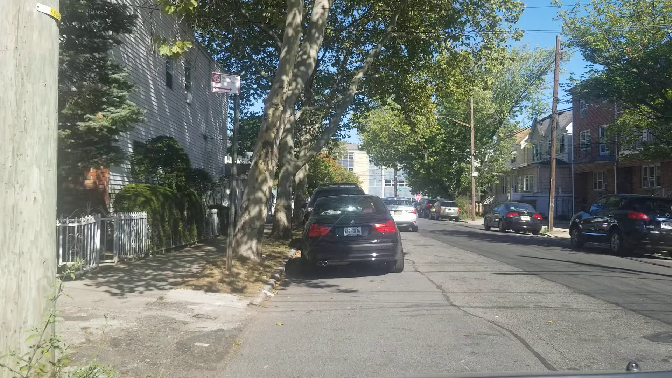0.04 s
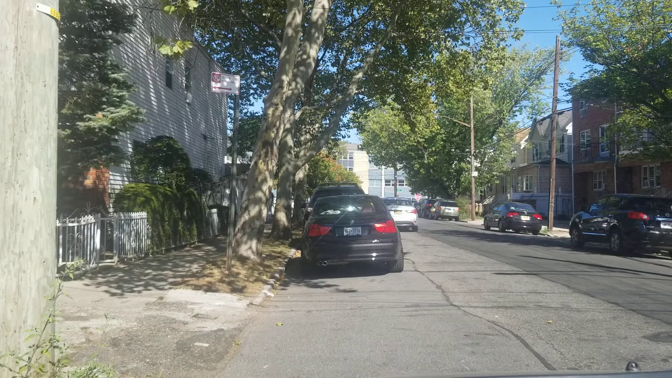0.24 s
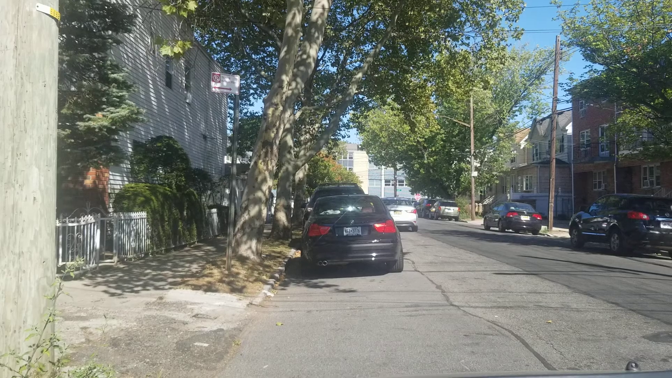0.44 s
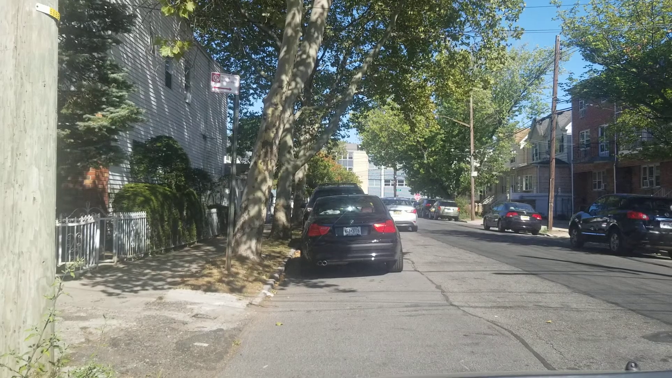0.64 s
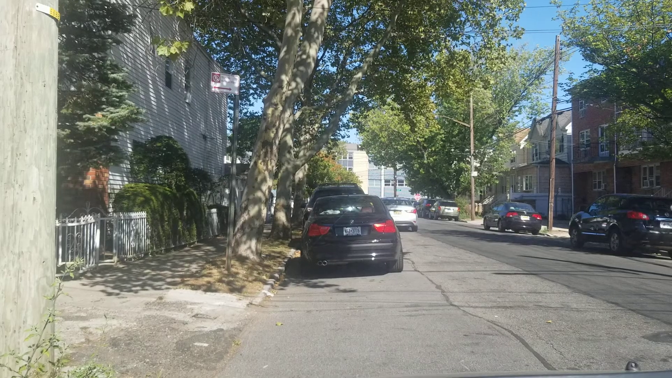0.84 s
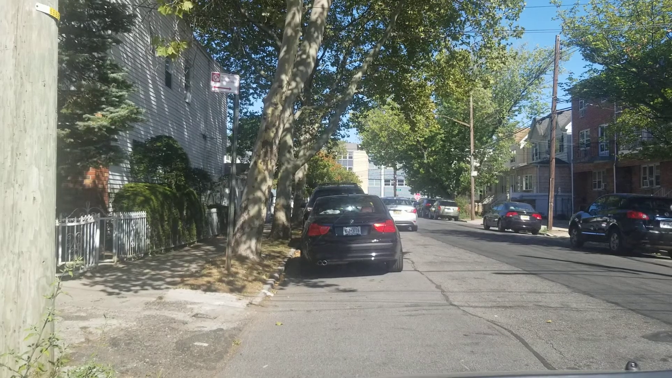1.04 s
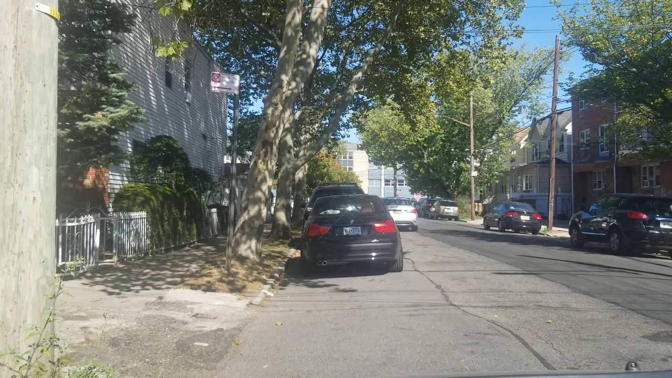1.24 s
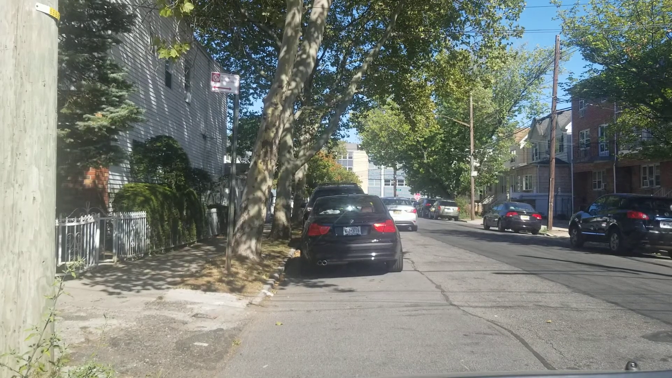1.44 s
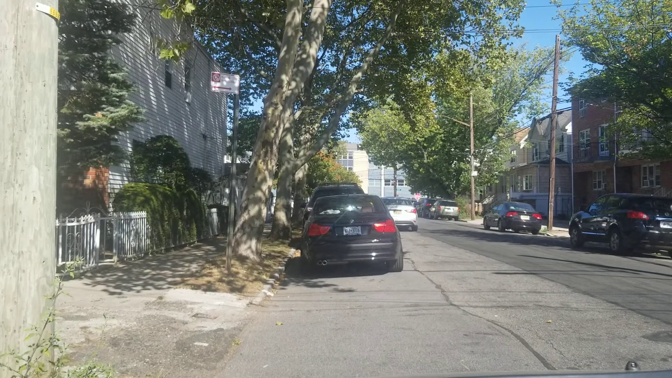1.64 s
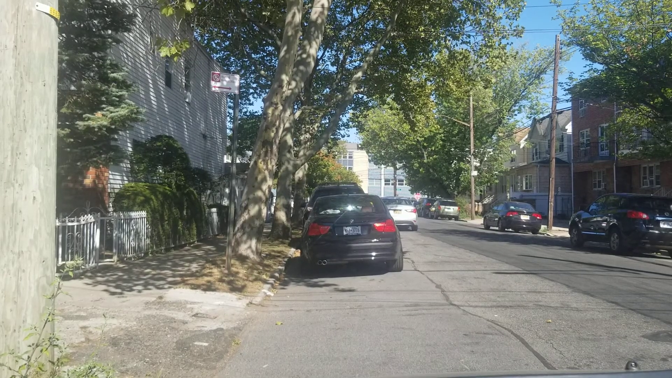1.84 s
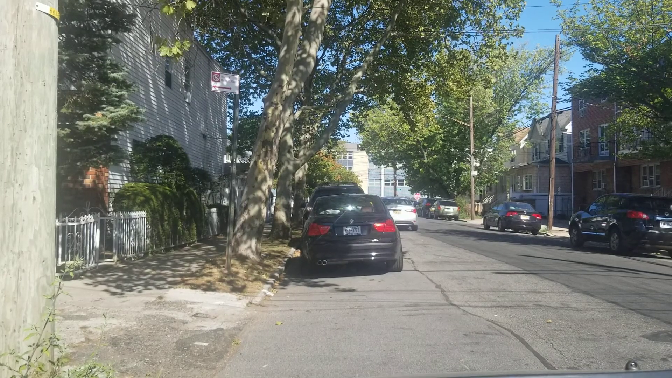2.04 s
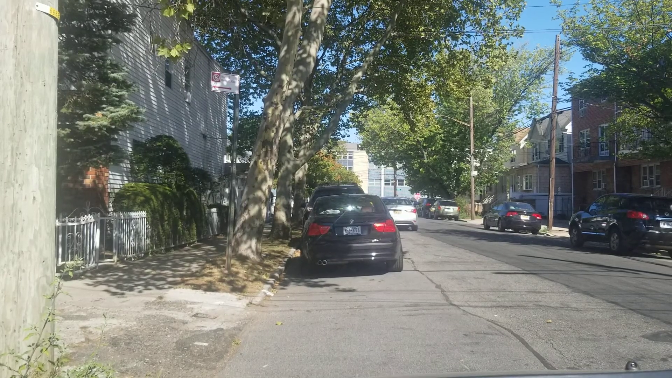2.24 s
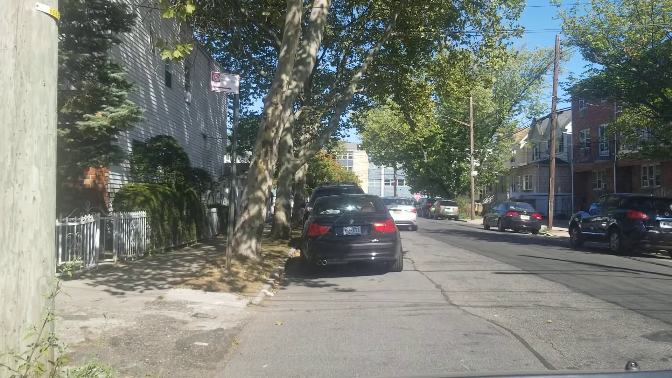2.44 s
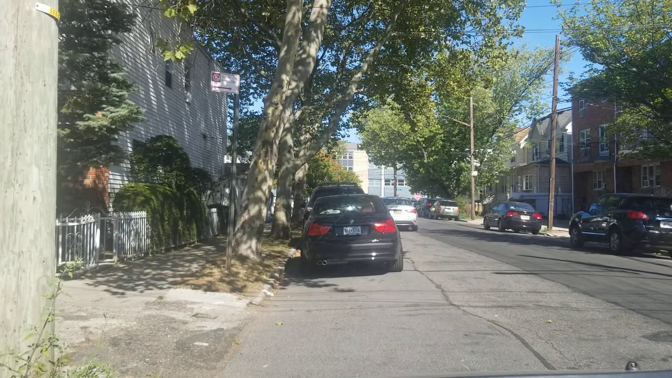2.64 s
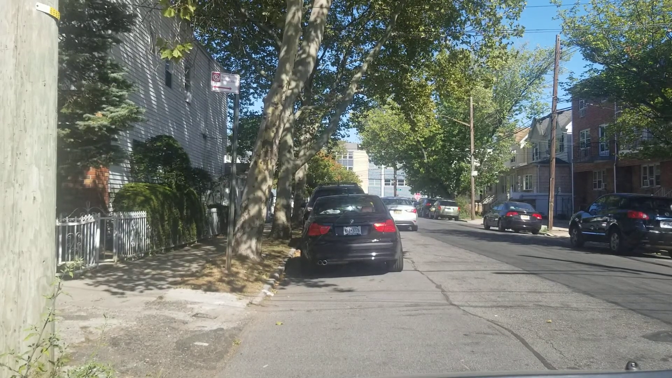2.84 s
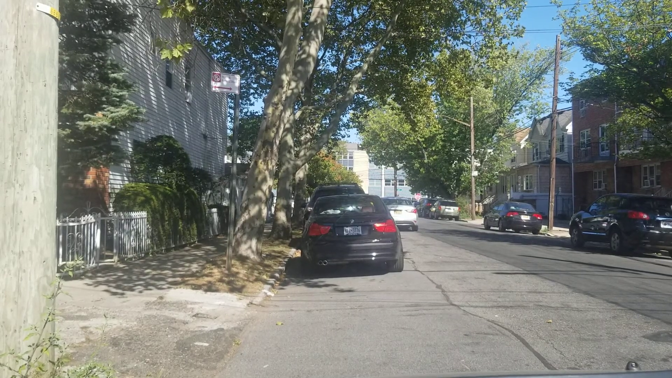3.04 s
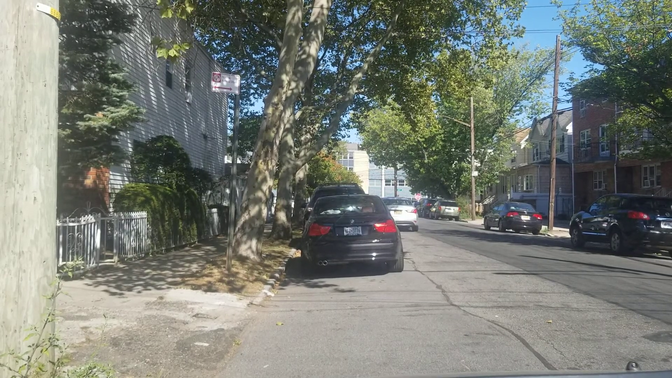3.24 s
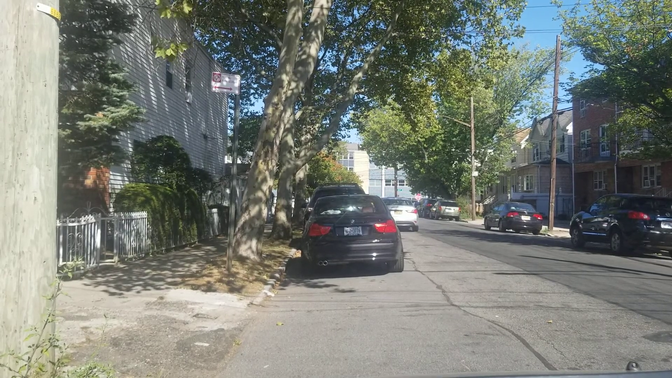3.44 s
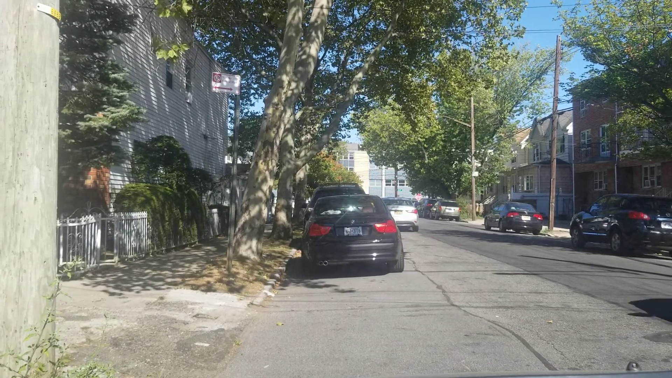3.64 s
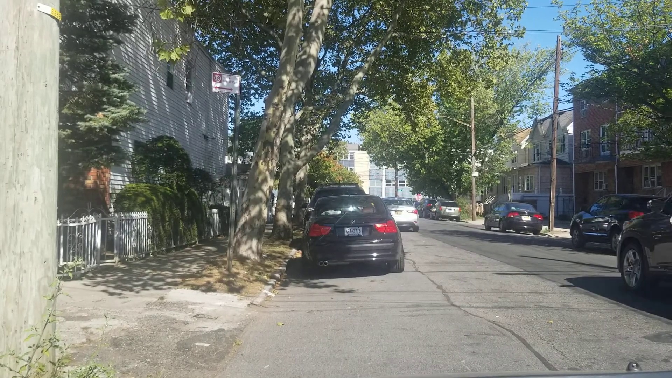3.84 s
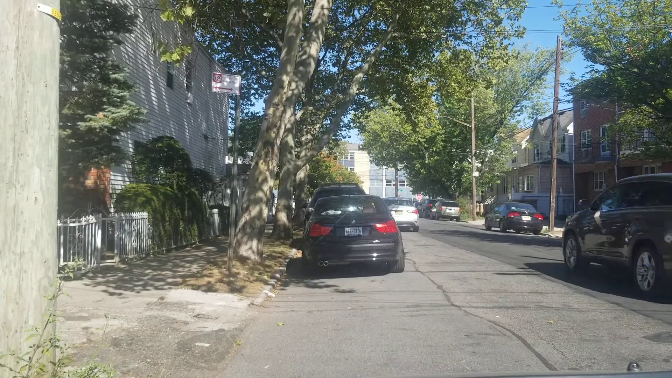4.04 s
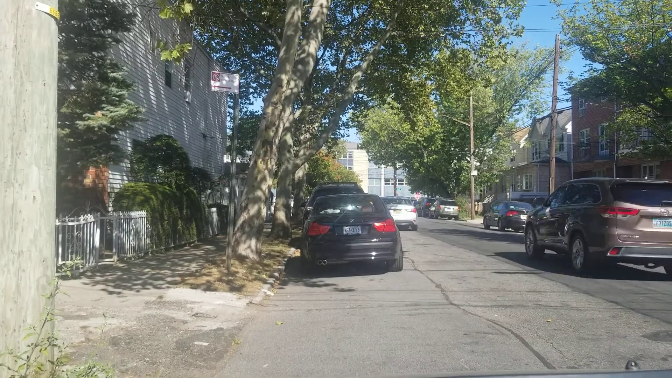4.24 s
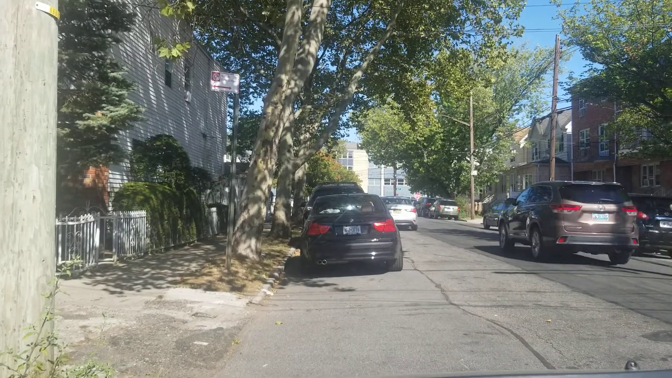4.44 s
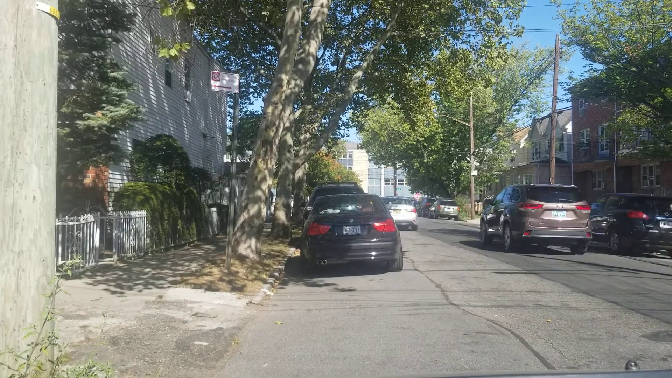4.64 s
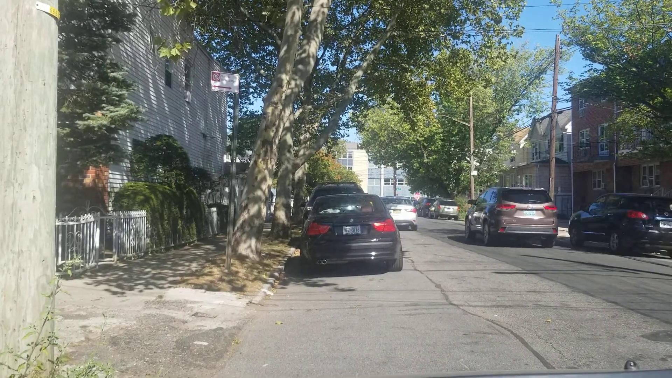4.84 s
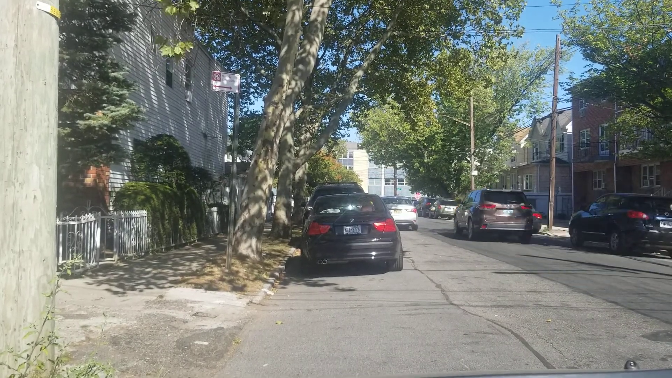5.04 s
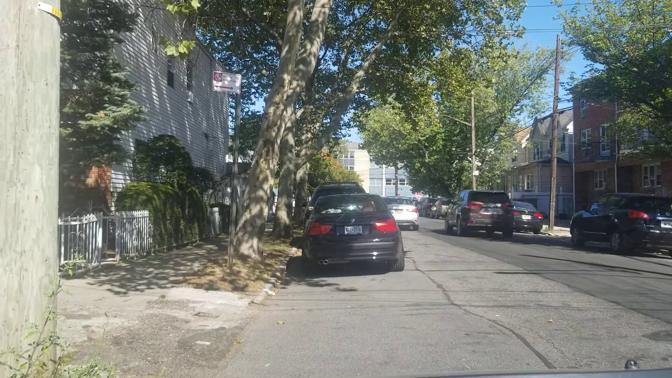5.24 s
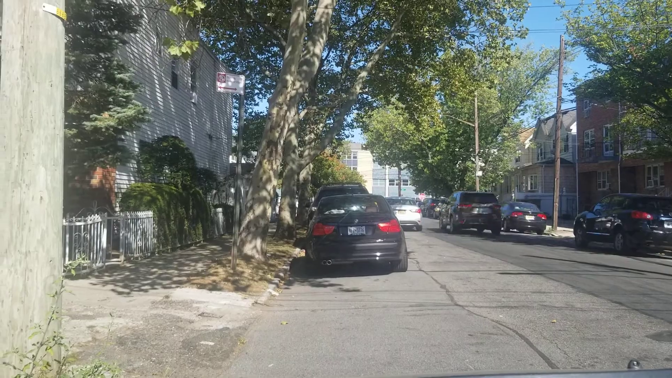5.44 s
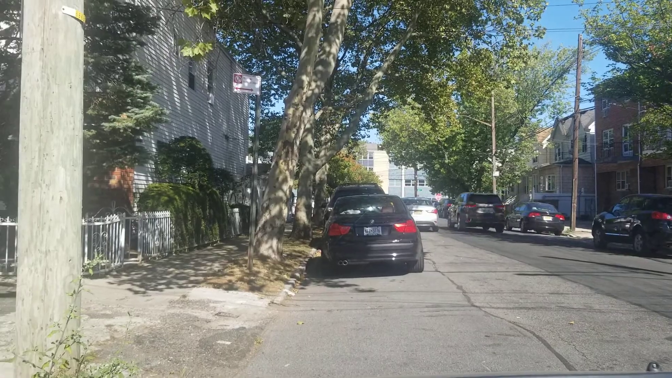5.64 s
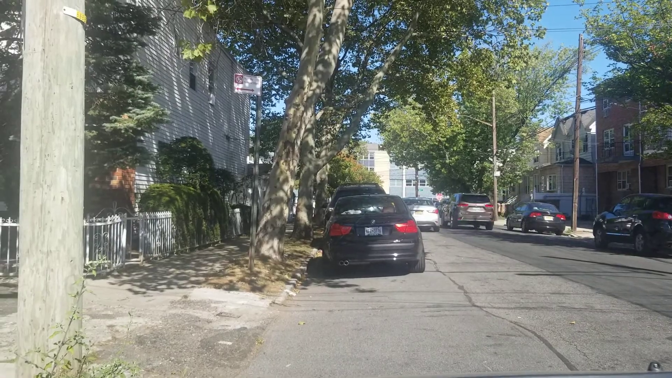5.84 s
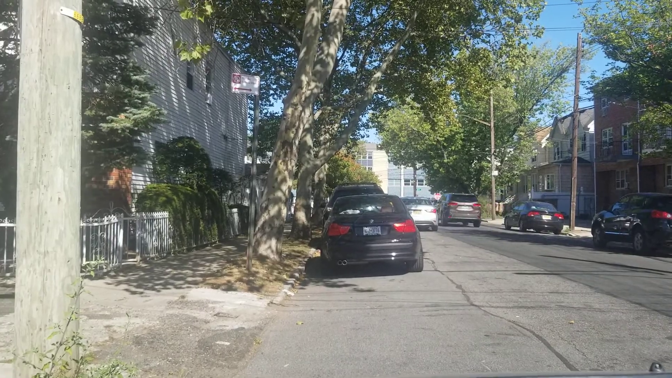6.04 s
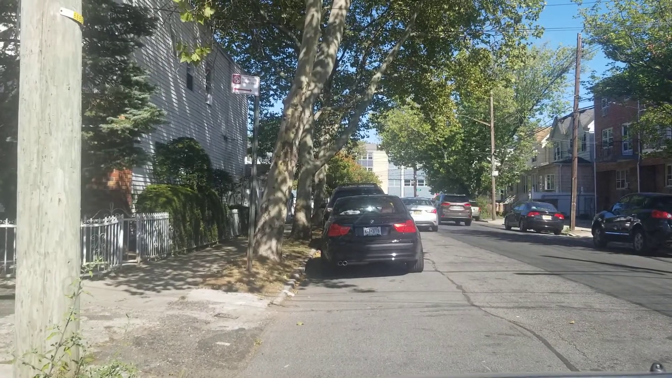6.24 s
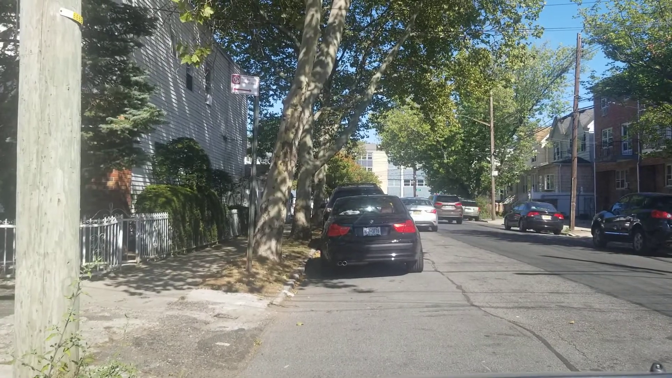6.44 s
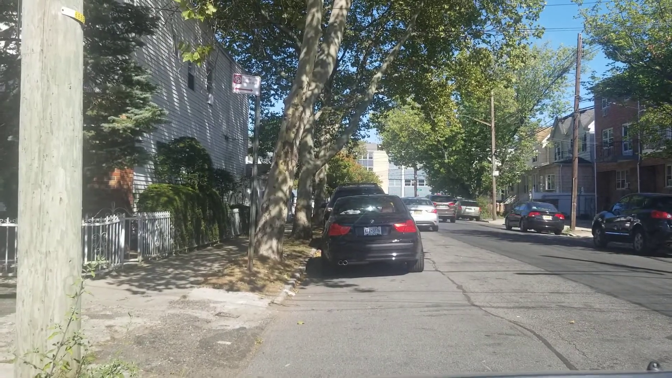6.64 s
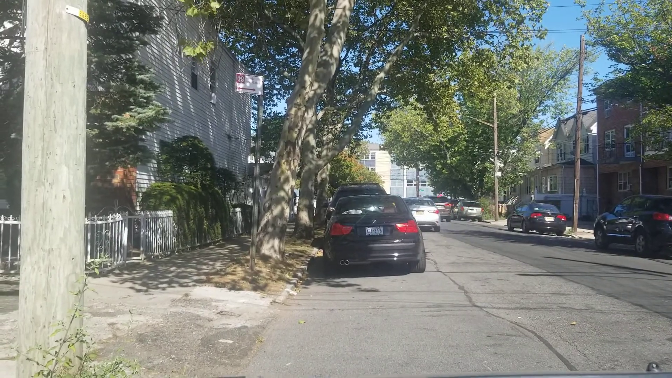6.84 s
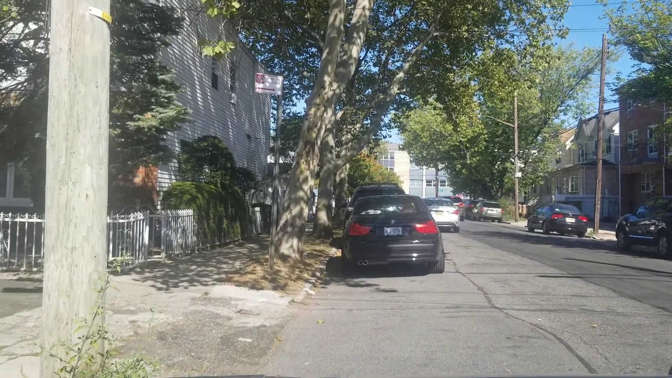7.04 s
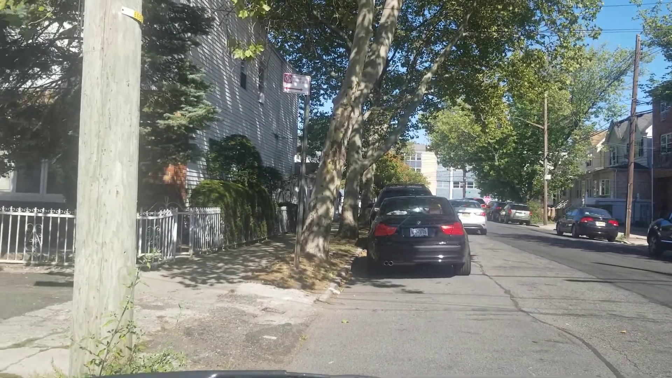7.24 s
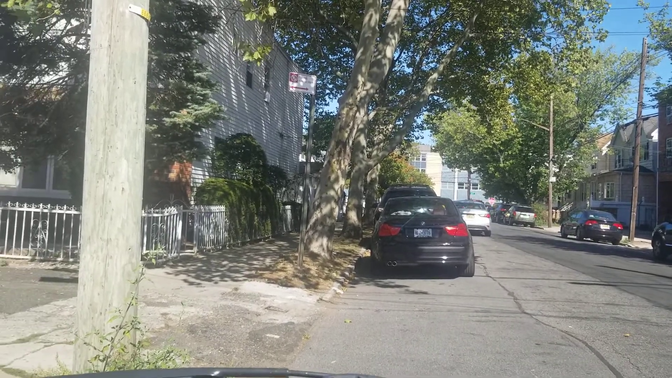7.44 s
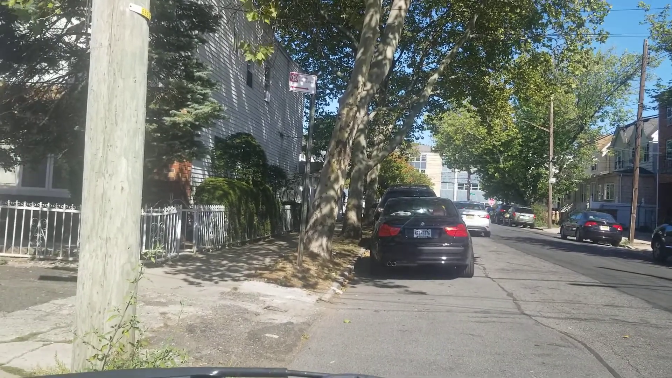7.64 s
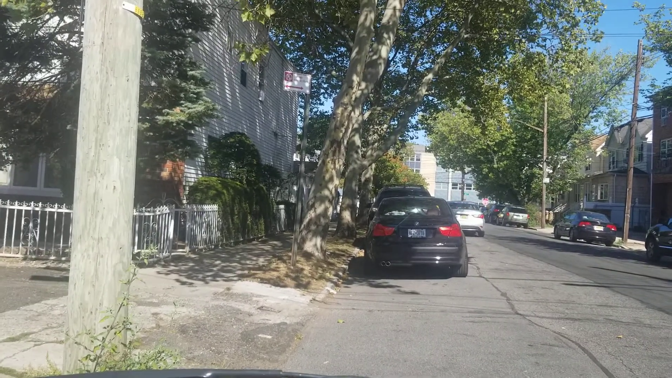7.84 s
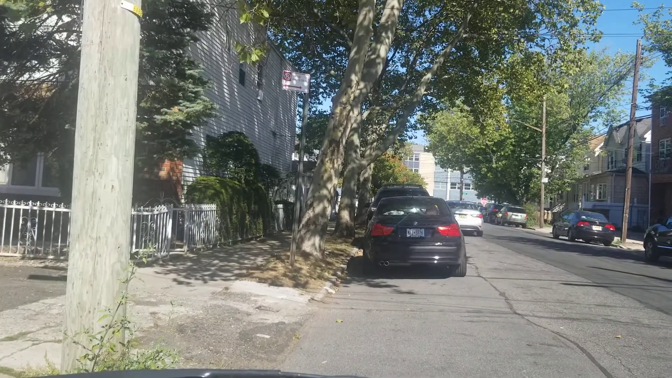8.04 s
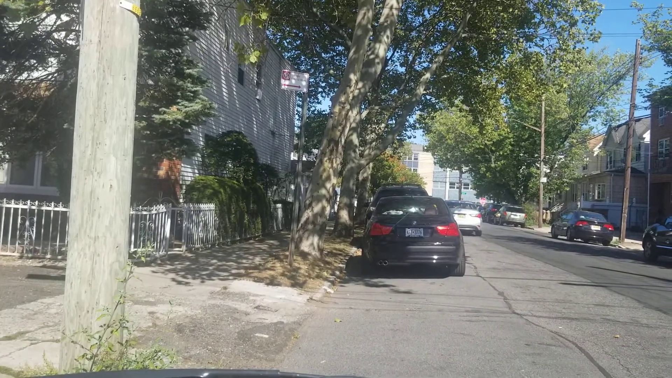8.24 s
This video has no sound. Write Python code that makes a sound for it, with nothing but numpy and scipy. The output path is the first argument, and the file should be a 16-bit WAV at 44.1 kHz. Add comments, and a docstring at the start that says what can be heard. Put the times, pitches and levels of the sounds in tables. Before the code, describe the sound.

From the front seats of a stationary car, a low four-cylinder idle hum, body rumble and diffuse air hiss run throughout. At 0-0.6 s thin, airy, high squeaks slide downward. Soft rubbing strokes come and go until about 3.4 s. At 1.1 s a cluster of dull knocks lands within a brief low rumble swell. A car approaches outside, its tyre roar and blurred tread hum strongest near 3 s, the tone falling as it passes and fades by about 4.5 s. Isolated plastic clicks at 2.4 and 2.7 s lead to sharp snaps and low knocks at 3.6-4.1 s. Faint knocks follow near 5 s. From 5.2 s close, dry clicks with hollow panel thumps come in irregular bursts, with a quick weakening creak at 6 s and soft knocks to 6.6 s. Clicking stays dense to the end at 8.3 s, with a buzzing springy twang around 7.96 s.

```python
"""Idling car with creaking plastic

The cabin of an idling car: rumble, air hiss and a four-cylinder hum made of crankshaft orders.
Coloured noise and a blurred tread tone pass outside as another car overtakes; a low rumble swells once.
Swelling friction noise makes soft rubbing, and gliding narrow noise makes thin squeaks.
Close by, hard plastic clicks and creaks in bursts of filtered noise over a ringing panel;
dull knocks are damped sines, and a springy part twangs a few times."""
import sys
import numpy as np
from scipy import signal
from scipy.fft import rfft, irfft, next_fast_len
from scipy.io import wavfile
from scipy.ndimage import uniform_filter1d

SR = 44100
rng = np.random.default_rng(int(sys.argv[2]) if len(sys.argv) > 2 else 0)


def log_audio(samples):
    """Write samples as a 16-bit WAV file to the path given in sys.argv[1]."""
    # one column per channel
    frames = np.atleast_2d(samples).T
    # limit to full scale, then quantise
    limited = np.clip(frames, -1, 1)
    pcm = np.round(limited * 32767).astype(np.int16)
    wavfile.write(sys.argv[1], SR, pcm)


N = 366030
TIME = np.arange(N) / SR


def from_db(db):
    """Decibels to gain."""
    return 10 ** (np.asarray(db) / 20)


def rms_one(x):
    """Scale to rms 1."""
    return x / np.sqrt(np.mean(x ** 2) + 1e-20)


def hit_one(x):
    """Scale a short sound to the energy of 10 ms at rms 1."""
    return rms_one(x) * np.sqrt(.01 * SR / x.shape[-1])


def in_time(rows):
    """Each column of a curve, interpolated at every sample."""
    s, *columns = np.transpose(rows)
    return [np.interp(TIME, s, c) for c in columns]


def pan(db):
    """Left and right gains of constant total power; positive dB favours the left."""
    gains = from_db(np.array([[db], [-db]]) / 2)
    return rms_one(gains)


def drift(rate):
    """Slow random sway with spread 1; a higher rate in Hz sways faster."""
    step = 40  # samples between the computed points
    r = np.exp(-2 * step * np.pi * rate / SR)
    noise = rng.standard_normal(N // step + 2002)
    slow = signal.lfilter([1], [1, -2 * r, r * r], noise)[2000:]  # skip the filter's start
    return np.interp(np.arange(N) / step, np.arange(len(slow)), rms_one(slow))


def pair(alike, size):
    """Left and right white noise with a given correlation."""
    mid, side = rng.standard_normal((2, size))
    alike = np.clip(alike, -1, 1)
    return np.sqrt(1 + alike) * mid + np.sqrt(1 - alike) * side * [[1], [-1]]


def butter(x, order, hz, kind="low"):
    """Butterworth low- or high-pass."""
    return signal.sosfilt(signal.butter(order, hz, kind, fs=SR, output="sos"), x)


def colour(x, spectrum):
    """Causal (minimum-phase) filter with the given spectrum, falling steeply beyond its ends."""
    size = next_fast_len(x.shape[-1] + 2048, real=True)
    octave = np.log2(np.maximum(np.fft.rfftfreq(size, 1 / SR), 5))
    hz, db = np.transpose(spectrum)
    beyond = np.abs(octave - np.clip(octave, np.log2(hz[0]), np.log2(hz[-1])))
    gain = from_db(np.interp(octave, np.log2(hz), db) - np.minimum(30 * beyond, 50))
    # folding the cepstrum forward in time gives the minimum phase
    cepstrum = irfft(np.log(gain), size)
    cepstrum[1:size // 2] *= 2
    cepstrum[size // 2 + 1:] = 0
    return irfft(rfft(x, size) * np.exp(rfft(cepstrum)), size)[..., :x.shape[-1]]


def resonate(x, hz, width_hz):
    """One resonance with gain 1 on top."""
    r = np.exp(-np.pi * width_hz / SR)
    zeros = np.array([1, 0, -1]) * (1 - r * r) / 2
    poles = [1, -2 * r * np.cos(2 * np.pi * hz / SR), r * r]
    return signal.lfilter(zeros, poles, x)


def dying(t, t60):
    """Envelope that loses 60 dB in t60 seconds."""
    return np.exp(-np.log(1000) * t / t60)


def swell(start_s, length_s, steepness):
    """An arch of height 1: a movement speeds up and slows down again."""
    along = (TIME - start_s) / length_s
    inside = (along > 0) & (along < 1)
    out = np.zeros(N)
    out[inside] = np.sin(np.pi * along[inside]) ** steepness
    return out


def blurred_tone(hz, blur_hz, alike):
    """Narrow noise that follows a pitch curve: an airy, unsteady tone of rms 1."""
    size = len(hz)
    blur = butter(pair(alike, size) + 1j * pair(alike, size), 2, blur_hz)
    carrier = np.exp(2j * np.pi * np.cumsum(hz) / SR)
    return rms_one((blur * carrier).real)


def add(out, s, sound):
    """Mix a short stereo sound in at time s."""
    i = int(s * SR)
    out[:, i:i + sound.shape[-1]] += sound[:, :N - i]


# Resonances of the cabin and its vents. Each row: pitch in Hz, width in Hz, level in dB.
CABIN_RESONANCES = [(789, 27, 9.5), (1255, 66, -14), (1615, 36, 7), (2573, 87, 11), (3780, 190, -4)]


def with_cabin_modes(x):
    """The cabin lifts a few narrow bands of the sound in it."""
    return x + sum(from_db(db) * resonate(x, hz, width_hz) for hz, width_hz, db in CABIN_RESONANCES)


# Colour of ventilation and body rumble. Each row: frequency in Hz, relative density in dB per Hz.
CABIN_SPECTRUM = [(30, -19), (52, 1), (85, -4.5), (140, -3.5), (210, -9), (330, -8), (550, -23),
                  (950, -32.5), (1600, -33), (2100, -35.5), (2600, -36.5), (3300, -34.5), (6400, -34.5),
                  (8500, -52.5), (14000, -46.5)]
# Its course. Each row: time in seconds, level in dB, share of air hiss in dB before colouring.
CABIN_COURSE = [(0, -51.5, -0.5), (.4, -47.5, -0.5), (1, -50, 6), (3.5, -44.5, 5.5), (4.6, -52, 1.5),
                (5.2, -50.5, 3.5), (5.8, -48.5, 0.5), (6.4, -45.5, 1.5), (7.2, -49, 4.5), (8.3, -48.5, 1.5)]


def cabin(split_hz=450, bass_alike=0.79, hiss_alike=0.039):
    """Rumble reaches both sides much alike; the air hiss above it is diffuse."""
    level_db, hiss_db = in_time(CABIN_COURSE)
    rumble = butter(pair(bass_alike, N), 2, split_hz)
    hiss = butter(pair(hiss_alike, N), 2, split_hz, "high")
    air = with_cabin_modes(rumble + hiss * from_db(hiss_db))
    return from_db(level_db) * rms_one(colour(air, CABIN_SPECTRUM)) * pan(.8)


# Idling speed. Each row: time in seconds, crankshaft turns per second.
IDLE_SPEED = [(0, 13.2), (2.5, 12.17), (3.5, 11.5), (4.5, 12.4), (5.5, 12.47), (6.5, 12.5), (8.3, 12.34)]
# Partials of the hum. Each row: multiple of the crankshaft rate, mean level in dB rms.
CRANKSHAFT_ORDERS = [(2, -49), (3, -46), (4, -57.5), (4.5, -57.5), (5.5, -57), (6, -71), (9, -57.5),
                     (10.5, -52.5), (12, -52), (13.5, -67.5), (19, -69.5), (24, -57.5), (36, -68),
                     (48, -74.5)]


def engine(waver_db=.5, wander=0.0013):
    """Orders of the idling crankshaft; the higher ones sway more in strength."""
    turns = np.cumsum(in_time(IDLE_SPEED)[0] * (1 + wander * drift(1.76))) / SR
    out = np.zeros(N)
    for order, db in CRANKSHAFT_ORDERS:
        half_orders = np.round(2 * order)  # a four-stroke cycle lasts two turns
        sway_db = waver_db * np.log2(order) * drift(1.3)
        phase = 2 * np.pi * rng.random()
        out += from_db(db + sway_db) * np.sin(np.pi * half_orders * turns + phase)
    return np.sqrt(2) * out * pan(2.2)


# Colour of the tyre roar. Each row: frequency in Hz, relative density in dB per Hz.
TYRE_SPECTRUM = [(250, -8), (400, 0.5), (600, -1), (880, -4.5), (1150, -8.5), (1600, -5), (2300, -11.5),
                 (4000, -27), (7000, -23), (9000, -42)]
# Colour of the low rumble. Each row: frequency in Hz, relative density in dB per Hz.
LOW_RUMBLE_SPECTRUM = [(25, -2.5), (45, -3.5), (80, -5), (150, -0.5), (260, -5.5), (400, -15.5),
                       (650, -13.5), (1200, -54.5)]
# Pitch of the tread hum. Each row: time in seconds, pitch in Hz.
TREAD_PITCH = [(1.0, 790), (1.9, 821), (2.75, 865), (2.95, 772), (3.2, 660), (3.5, 590)]
# the other car overtakes at a steady speed; its rumble comes from REAR_M behind the tyre roar
PASS_S, SPEED_M_PER_S, DISTANCE_M, REAR_M = 3.04, 8.45, 3, 1.1
# levels at the closest point, before flutter and shading
TYRE_DB, TREAD_DB, PASS_RUMBLE_DB = -41.5, -47.5, -37
# extra loss for each metre that the car is ahead
TYRE_SHADE_DB_PER_M, TREAD_SHADE_DB_PER_M, RUMBLE_SHADE_DB_PER_M = 1, 4, 0.14
# further back than this the car is screened, with a loss for each metre more
OPEN_ROAD_M, TYRE_BEHIND_DB_PER_M, TREAD_BEHIND_DB_PER_M = 17.6, .45, 1.6


def passing_car(flutter_db=1.6, tread_blur_hz=42, rumble_falloff=1.7, surge_db=3.5):
    """Tyre roar and tread hum follow 1 / distance with shading; the rumble is strong only alongside."""
    ahead_m = SPEED_M_PER_S * (TIME - PASS_S)
    gone_m = np.maximum(ahead_m, 0)
    behind_m = np.maximum(-ahead_m - OPEN_ROAD_M, 0)
    near, rear_near = DISTANCE_M / np.hypot(DISTANCE_M, [ahead_m, ahead_m - REAR_M])

    tyre_db = TYRE_DB - TYRE_SHADE_DB_PER_M * gone_m - TYRE_BEHIND_DB_PER_M * behind_m
    tyre_db = tyre_db + flutter_db * drift(8.7)
    tyres = near * from_db(tyre_db) * rms_one(colour(pair(0.013, N), TYRE_SPECTRUM))

    tread_db = TREAD_DB - TREAD_SHADE_DB_PER_M * gone_m - TREAD_BEHIND_DB_PER_M * behind_m
    tread = near * from_db(tread_db) * blurred_tone(in_time(TREAD_PITCH)[0], tread_blur_hz, 0.076)

    rumble_db = PASS_RUMBLE_DB - RUMBLE_SHADE_DB_PER_M * gone_m + surge_db * drift(9.6)
    rumble = rms_one(colour(pair(0.91, N), LOW_RUMBLE_SPECTRUM))
    rumble = rear_near ** rumble_falloff * from_db(rumble_db) * rumble
    return (tyres + tread) * pan(0.26) + rumble * pan(.8)


# a low rumble swells around the first knocks
SHUDDER_S, SHUDDER_LENGTH_S, SHUDDER_DB = 0.92, 0.76, -46


def shudder(steepness=0.56):
    """Low noise, nearly alike on both sides, swells and fades once."""
    rumble = rms_one(colour(pair(0.83, N), LOW_RUMBLE_SPECTRUM))
    return from_db(SHUDDER_DB) * swell(SHUDDER_S, SHUDDER_LENGTH_S, steepness) * rumble


# Colour of the friction. Each row: frequency in Hz, relative density in dB per Hz.
RUB_SPECTRUM = [(700, -21.5), (1500, -1.5), (2500, 0.5), (4000, 2.5), (6400, 2), (8500, -14), (12000, -7.5),
                (15500, -13.5)]
# Rubbing strokes. Each row: start in seconds, length in seconds, peak level in dB before flutter.
RUB_STROKES = [(0.465, 0.18, -52), (0.957, 0.19, -55), (1.132, 0.34, -47), (1.457, 0.33, -54),
               (1.995, 0.14, -53), (2.248, 0.2, -47), (2.506, 0.39, -44.5), (2.78, 0.31, -55.5),
               (3.103, 0.33, -46), (4.069, 0.17, -55.5), (5.915, 0.072, -53.5)]
# between strokes a light contact stays
CONTACT_FROM_S, CONTACT_TO_S, CONTACT_DB = 0.58, 3.8, -65.5


def rubbing(grains_per_s=500, grain_db=-9, spread_db=-1.5, flutter_db=2.0,
            steepness=0.85, contact_steepness=0.49):
    """Soft friction: a smooth hiss with tiny catches in it, swelling with each stroke."""
    catch_gain = from_db(spread_db * np.minimum(rng.exponential(1, N), 4))
    catches = (rng.random(N) < grains_per_s / SR) * catch_gain
    friction = pair(0.017, N) + from_db(grain_db) * rms_one(catches * pair(0.14, N))
    contact_arch = swell(CONTACT_FROM_S, CONTACT_TO_S - CONTACT_FROM_S, contact_steepness)
    contact = from_db(CONTACT_DB) * contact_arch
    strokes = sum(from_db(db) * swell(s, length, steepness) for s, length, db in RUB_STROKES)
    level = np.hypot(contact, strokes) * from_db(flutter_db * drift(57))
    return level * rms_one(colour(friction, RUB_SPECTRUM)) * pan(0.9)


# Thin squeaks. Each row: start in seconds, length in seconds, start pitch in Hz, end pitch in Hz,
# blur in Hz, level in dB.
SQUEAK_GLIDES = [(0.032, .11, 2950, 2710, 170, -60), (0.075, 0.21, 7260, 7000, 240, -59),
                 (0.266, 0.19, 8350, 7000, 227, -44), (0.307, 0.21, 7500, 6920, 170, -45),
                 (.38, 0.27, 7000, 6940, 220, -59), (0.624, 0.12, 2700, 2720, 150, -60),
                 (4.963, 0.15, 4400, 4360, 80, -70), (5.5, 0.15, 8600, 8490, 35.3, -72),
                 (6.3, 0.27, 8350, 8130, 70, -72)]


def squeaks(octave_db=-25):
    """Each squeak swells and fades while its pitch slides and settles; a faint octave rides on it."""
    out = np.zeros((2, N))
    for s, length, start_hz, end_hz, blur_hz, db in SQUEAK_GLIDES:
        along = np.linspace(0, 1, int(length * SR))
        hz = end_hz + (start_hz - end_hz) * (1 - along) ** 2.5
        octave = blurred_tone(2 * hz, 2 * blur_hz, 0.24)
        tone = blurred_tone(hz, blur_hz, 0.16) + from_db(octave_db) * octave
        add(out, s, from_db(db) * np.sin(np.pi * along) ** 2 * tone * pan(1.0))
    return out


# Plucks of a springy part. Each row: start in seconds, level in dB.
PLUCKS = [(5.5186, -49), (7.1855, -55), (7.956, -30.5)]
# Modes of the spring. Each row: pitch in Hz, relative level in dB, t60 in seconds.
SPRING_MODES = [(867, -7.5, 0.1), (1340, -9.5, 0.2), (1420, -28, 0.16), (1610, -17, 0.17), (2380, -14, 0.2),
                (2630, -12, 0.11), (3500, 1, 0.049), (3750, 2, 0.087), (4150, -14, 0.13), (7200, -17, 0.07)]


def twangs(blur_hz=60):
    """A springy part, plucked near some clicks, rings with a buzz that blurs its modes."""
    out, t = np.zeros((2, N)), np.arange(SR // 3) / SR
    for s, level_db in PLUCKS:
        ring = sum(from_db(db) * dying(t, t60) * blurred_tone(np.full(len(t), hz), blur_hz, 0.13)
                   for hz, db, t60 in SPRING_MODES)
        add(out, s, from_db(level_db) * ring)
    return out


# Dull knocks. Each row: start in seconds, level of the swing in dB rms over 10 ms, pitch in Hz.
KNOCK_HITS = [(1.0652, -31, 356), (1.076, -29, 478), (1.079, -25, 103), (1.082, -34.5, 574),
              (1.093, -31, 124), (1.118, -41.5, 405), (3.618, -25, 150), (3.742, -31, 140),
              (3.947, -29, 149), (4.119, -39, 116), (4.821, -32.5, 173), (4.992, -41.5, 153),
              (5.112, -34, 200), (6.129, -33, 226), (6.188, -34, 183), (6.405, -40.5, 325),
              (6.449, -38, 282), (6.554, -38.5, 149)]
# the cabin's boom against the blow at a usual strength, and its growth per dB of a heavier blow
BOOM_DB, USUAL_KNOCK_DB, BOOM_GROWTH = -2, -26, 0.27
# the trim's second mode, and the tick, which is louder on stiffer, higher spots
OVERTONE_RATIO, OVERTONE_DB = 2.35, -14
TICK_DB, TICK_AT_HZ, TICK_DB_PER_OCTAVE = -21.5, 150, 9


def knocks(ring_t60=0.041, boom_t60=0.087, tick_t60=0.035, overtone_t60=0.027):
    """A soft blow: a damped swing of the trim with one overtone, a brief cabin boom and a faint tick."""
    out, t = np.zeros((2, N)), np.arange(8000) / SR
    # frequency in Hz, relative density in dB per Hz
    boom_spectrum = [(70, -6.0), (150, 0), (380, 0.5), (800, -24.5)]
    tick_spectrum = [(400, 6.0), (1500, -5.0), (6500, -19.5), (15000, -52)]
    for s, db, hz in KNOCK_HITS:
        boom_db = BOOM_DB + BOOM_GROWTH * (db - USUAL_KNOCK_DB)
        tick_db = TICK_DB + TICK_DB_PER_OCTAVE * np.log2(hz / TICK_AT_HZ)
        overtone = np.sin(2 * np.pi * OVERTONE_RATIO * hz * t) * dying(t, overtone_t60)
        main = np.sin(2 * np.pi * hz * t) * dying(t, ring_t60)
        swing = hit_one(main + from_db(OVERTONE_DB) * overtone)
        boom = hit_one(colour(pair(0.15, len(t)) * dying(t, boom_t60), boom_spectrum))
        tick = hit_one(colour(pair(0.09, len(t)) * dying(t, tick_t60), tick_spectrum))
        blow = swing + from_db(boom_db) * boom + from_db(tick_db) * tick
        add(out, s, from_db(db) * blow * pan(1.0))
    return out


# Modes of the panel behind the clicks. Each row: pitch in Hz, mean level in dB, t60 in seconds.
PANEL_MODES = [(198, -18, 0.16), (265, 2, 0.024), (344, 2, 0.031), (492, 1.5, 0.017), (725, -9, 0.0027)]


def panel_thump(t, detune=0.083, spread_db=5.0, right_lag=0.00035, lowest_hz=170):
    """The panel's modes vary at every touch, radiate no deep bass and reach the left side first."""
    late = np.maximum(t - np.array([[0], [right_lag]]), 0)
    swing = 0
    for hz, db, t60 in PANEL_MODES:
        gain = from_db(db + rng.normal(0, spread_db, (2, 1)))
        touched_hz = hz * np.exp(detune * rng.normal())
        swing = swing - gain * dying(late, t60) * np.sin(2 * np.pi * touched_hz * late)
    return hit_one(butter(swing, 2, lowest_hz, "high"))


# Plastic clicks, and the bright ticks that sound with the knocks at 6.129, 6.188 and 6.556 s. Each row: start
# in seconds, # then snap, panel thump and fizz in dB rms over 10 ms, ring pitch in Hz, left-right balance in
# dB, # lead-in slip in dB against the snap or None.
PLASTIC_CLICKS = [(1.0761, -39.5, -36, -47, 2190, 0, None), (2.4004, -28, -53, -46, 4720, 4.5, None),
                  (2.7101, -34, -35.5, -46, 3820, 11, None), (3.6108, -29.5, -45, -50, 2520, 2, None),
                  (3.7166, -20.5, -37, -45, 5300, 5.5, None), (3.9044, -30, -40, -51, 3400, 1, -2.5),
                  (3.9143, -28.5, -37, -46, 4780, 4, None), (3.9397, -18.5, -31.5, -29, 5400, 3.5, None),
                  (4.0691, -41.5, -42, -48, 4300, 3, None), (4.117, -33, -56, -35, 3920, 4.5, None),
                  (4.856, -43.5, -49, -67.5, 4180, -15, None), (5.0096, -54, -62, -71, 4400, -2, None),
                  (5.2457, -26, -30, -40.5, 3360, 1, -9), (5.327, -24.5, -27, -36, 3820, 1, -7),
                  (5.366, -42, -46, -62, 3470, 6, None), (5.396, -24, -30, -37.5, 3650, 3, None),
                  (5.4478, -33.5, -44, -52, 3860, 5, None), (5.517, -34, -37.5, -52, 2700, 9, -2.5),
                  (5.7128, -27, -32.5, -37.5, 3620, 0.5, -6.5), (5.7738, -32, -35, -45, 3170, 4.5, -1),
                  (6.1294, -54, -37, -70, 2560, -19, None), (6.1878, -49.5, -37.5, -70, 2760, -12, None),
                  (6.556, -47.5, -37, -75, 3140, -30, None), (6.6294, -33, -30, -52, 3800, 4, None),
                  (6.6552, -30, -30, -38, 3450, 3, None), (6.6879, -23, -30.5, -34.5, 3240, 6, -18),
                  (6.7164, -32, -32.5, -52, 3700, 1, None), (6.7381, -41.5, -51, -74, 3570, -1, None),
                  (6.944, -27, -34, -57, 3300, 6.5, None), (6.9796, -24.5, -38, -36, 3830, 1, None),
                  (7.1083, -25, -30.5, -35.5, 3430, 1, None), (7.1353, -26, -32, -38.5, 4030, 4, 0.5),
                  (7.1848, -30.5, -43.5, -48, 3600, .5, None), (7.4103, -25.5, -34.5, -42, 3630, 0, None),
                  (7.434, -28.5, -33, -38, 3280, 1, 5.5), (7.4722, -27.5, -39.5, -45, 3700, -0.5, None),
                  (7.7654, -28.5, -29, -44, 3650, 0.5, None), (7.792, -25, -27, -38, 3320, -2.5, None),
                  (7.8342, -26.5, -25.5, -36, 2340, -1, None), (7.8868, -28, -25.5, -39, 2820, 1.5, None),
                  (7.9577, -28.5, -37, -39, 4030, -2.5, None), (8.0792, -23.5, -28, -39, 4000, -5, None),
                  (8.0966, -34, -42, -43, 4100, 2, None), (8.1394, -27.5, -26, -35.5, 3620, -4, None)]
# the lead-in slip comes just before its click and hardly moves the panel
LEAD_S, LEAD_THUMP_DB = .0068, -13.5
# one creak: a quick, weakening run of slips; the levels are those of the first
CREAK_S, CREAK_STEP_S, CREAK_LOSS_DB = 5.9773, .0074, 2
CREAK_SNAP_DB, CREAK_THUMP_DB, CREAK_FIZZ_DB, CREAK_HZ, CREAK_SIDE_DB = -28.5, -27, -49, 3930, -5


def slips(count=5):
    """Yield every slip of the plastic: the creak's weakening run, then each click after any lead-in."""
    for k in range(count):
        loss_db = k * CREAK_LOSS_DB
        yield (CREAK_S + k * CREAK_STEP_S, CREAK_SNAP_DB - loss_db, CREAK_THUMP_DB - loss_db,
               CREAK_FIZZ_DB - loss_db, CREAK_HZ, CREAK_SIDE_DB)
    for s, snap_db, thump_db, fizz_db, hz, side_db, lead_db in PLASTIC_CLICKS:
        if lead_db is not None:
            lead_snap_db = snap_db + lead_db
            yield s - LEAD_S, lead_snap_db, lead_snap_db + LEAD_THUMP_DB, fizz_db + lead_db, hz, side_db
        yield s, snap_db, thump_db, fizz_db, hz, side_db


# Colour of the bright snap. Each row: frequency in Hz, relative density in dB per Hz.
SNAP_SPECTRUM = [(1500, -24.5), (2100, -6.5), (2600, -2.5), (3700, -2.5), (5000, -4.5), (6600, -3.5),
                 (8200, -15.5)]
# Colour of the hollow clack. Each row: frequency in Hz, relative density in dB per Hz.
CLACK_SPECTRUM = [(500, -8), (800, 1), (1200, 0.5), (1900, 1), (2700, -10)]
# Colour of the airy fizz. Each row: frequency in Hz, relative density in dB per Hz.
FIZZ_SPECTRUM = [(6500, 6), (8000, -22), (9500, -5), (12000, 1.5), (14000, -2.5), (16500, -14.5)]
# the clack's level follows snap and thump, and is louder on low-pitched spots
USUAL_HZ = 3340
CLACK_DB, CLACK_THUMP_SHARE, CLACK_DB_PER_OCTAVE = -5.5, 0.19, -7.5
# scatter against crack; it grows as a slip glances off (much snap, little thump)
SCATTER_DB, SCATTER_GROWTH = -8.5, 0.77
# the narrow side modes of a clicking spot stay weak, so that it sounds dry
SIDE_MODES_DB = -2


def clicks(crack_t60=0.0078, tail_t60=0.05, cabin_t60=0.37, cabin_db=-24, ring_db=8.5,
           ring_width_hz=330, fizz_tail_db=-4, grain_db=1.0, overtone_width_hz=110):
    """Each slip is a sharp crack, a scatter of near reflections and a thump of the panel."""
    out, t = np.zeros((2, N)), np.arange(6000) / SR

    def burst(tail_db):
        """Crack, an uneven scatter of reflections and small after-slips, and the short cabin tail."""
        grain = rms_one(uniform_filter1d(rng.standard_normal(len(t)), size=70))
        unevenness = from_db(grain_db * grain)
        crack = hit_one(pair(0.045, len(t)) * dying(t, crack_t60))
        near = hit_one(pair(0, len(t)) * unevenness * dying(t, tail_t60))
        tail = hit_one(with_cabin_modes(pair(0, len(t))) * dying(t, cabin_t60))
        return crack + from_db(tail_db) * near + from_db(cabin_db) * tail

    for s, snap_db, thump_db, fizz_db, hz, side_db in slips():
        glance_db = snap_db - thump_db
        tail_db = SCATTER_DB + SCATTER_GROWTH * glance_db
        clack_db = snap_db + CLACK_DB - CLACK_THUMP_SHARE * glance_db
        clack_db += CLACK_DB_PER_OCTAVE * np.log2(hz / USUAL_HZ)
        hit = burst(tail_db)
        # each spot has a main pitch of its own and a few weaker, narrower modes
        main = from_db(ring_db) * resonate(hit, hz, ring_width_hz)
        side_modes = sum(resonate(hit, mode_hz, overtone_width_hz)
                         for mode_hz in rng.uniform(2297, 6470, size=4))
        snap = colour(hit + main + from_db(SIDE_MODES_DB) * side_modes, SNAP_SPECTRUM)
        clack = colour(burst(tail_db), CLACK_SPECTRUM)
        fizz = colour(burst(tail_db + fizz_tail_db), FIZZ_SPECTRUM)
        bright = from_db(snap_db) * hit_one(snap) + from_db(clack_db) * hit_one(clack)
        bright = bright + from_db(fizz_db) * hit_one(fizz)
        add(out, s, bright * pan(side_db) + from_db(thump_db) * panel_thump(t) * pan(7.1))
    return out


def scene():
    """Everything heard from the front seats."""
    background = cabin() + engine() + passing_car() + shudder()
    return background + rubbing() + squeaks() + twangs() + knocks() + clicks()


def record(dry, cutoff_hz=16300):
    """The sharpest peaks are rounded and the top is cut steeply."""
    rounded = .9 * np.tanh(dry / .9)
    return signal.sosfilt(signal.ellip(10, .1, 80, cutoff_hz, fs=SR, output="sos"), rounded)


dry = scene()
out = record(dry)
log_audio(out)
```